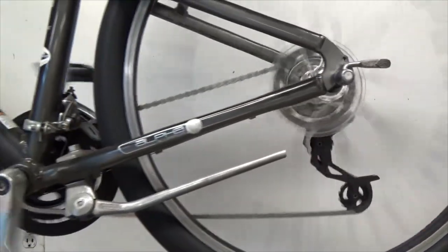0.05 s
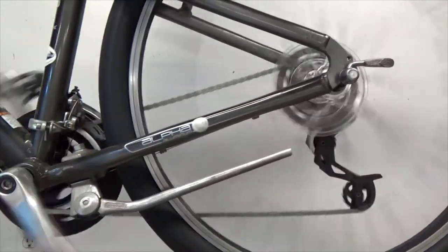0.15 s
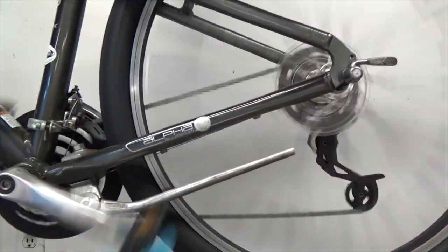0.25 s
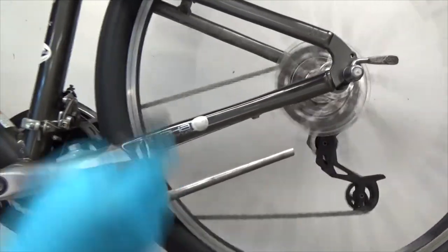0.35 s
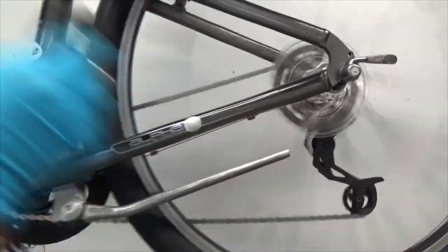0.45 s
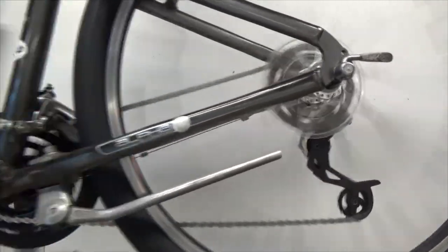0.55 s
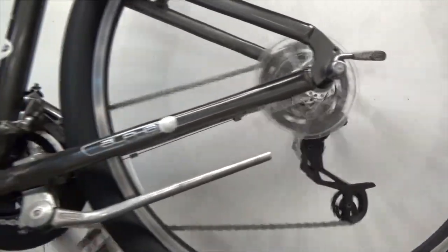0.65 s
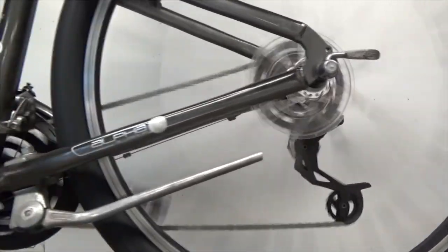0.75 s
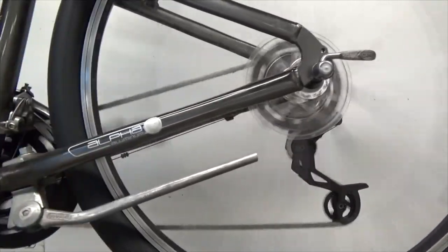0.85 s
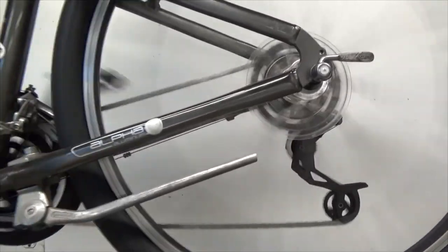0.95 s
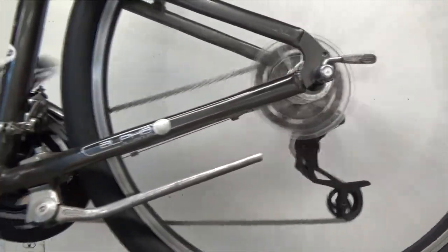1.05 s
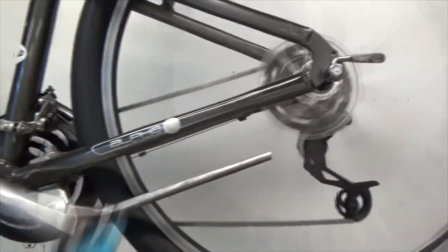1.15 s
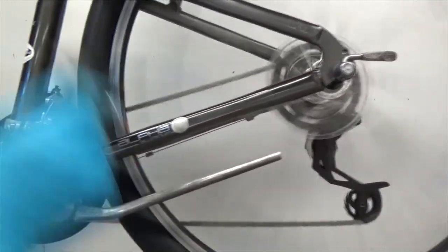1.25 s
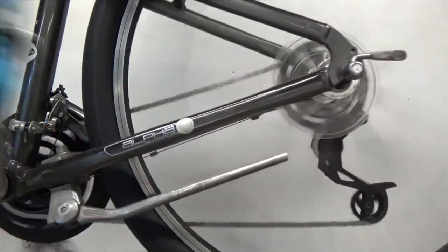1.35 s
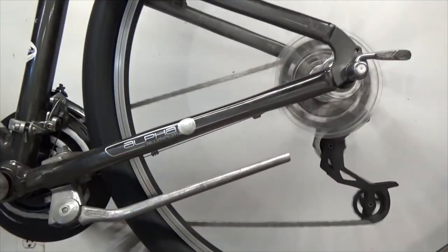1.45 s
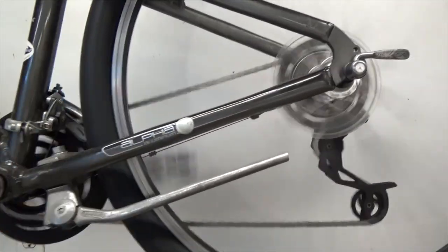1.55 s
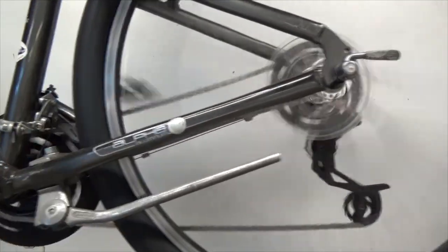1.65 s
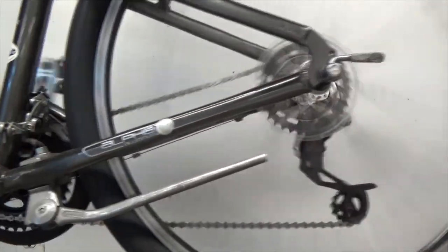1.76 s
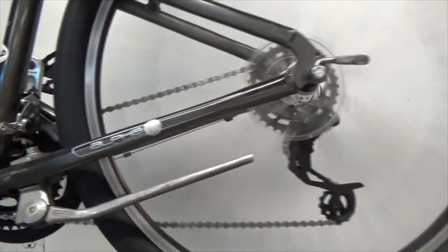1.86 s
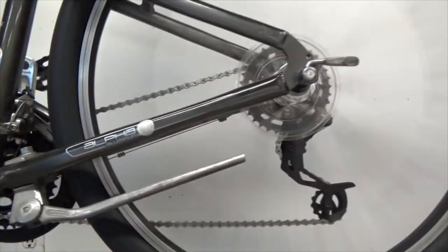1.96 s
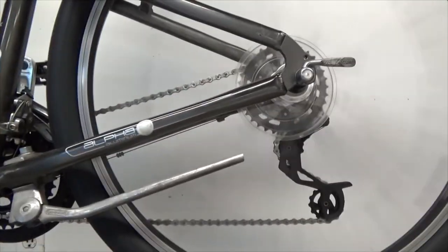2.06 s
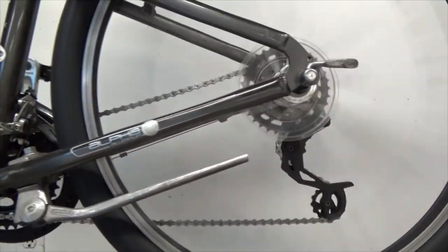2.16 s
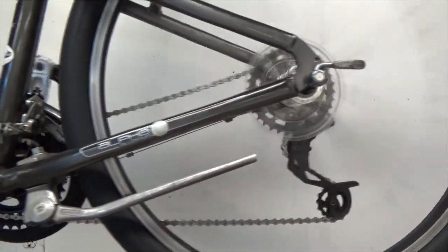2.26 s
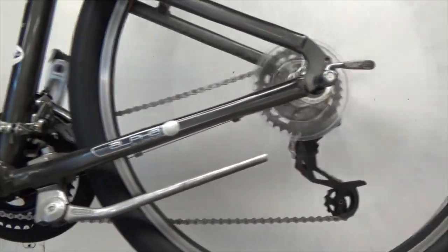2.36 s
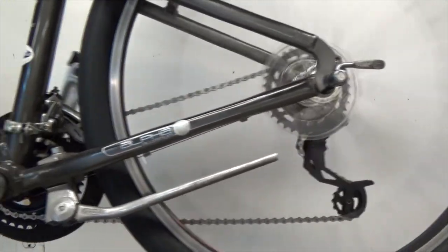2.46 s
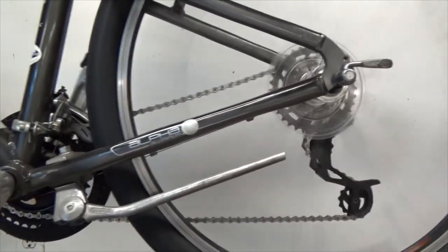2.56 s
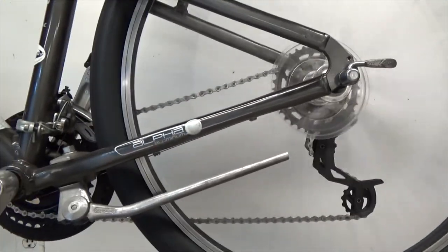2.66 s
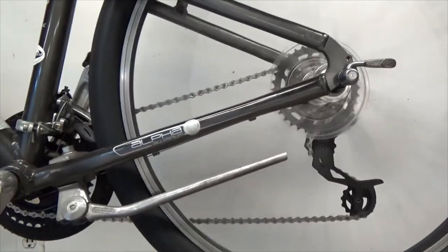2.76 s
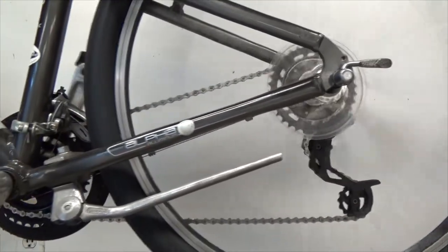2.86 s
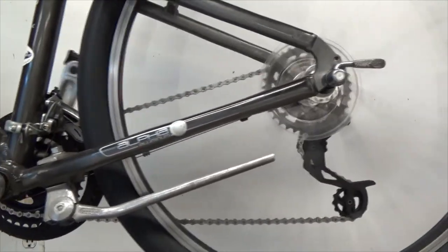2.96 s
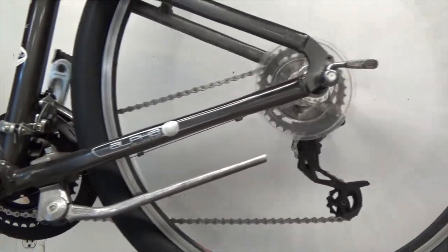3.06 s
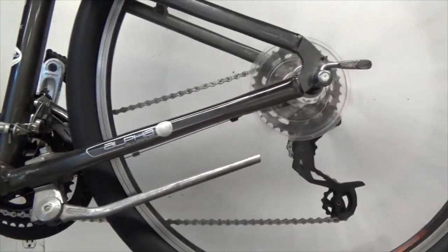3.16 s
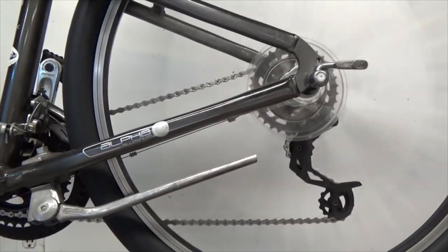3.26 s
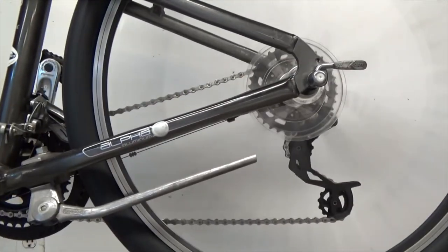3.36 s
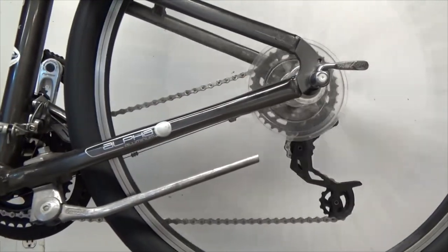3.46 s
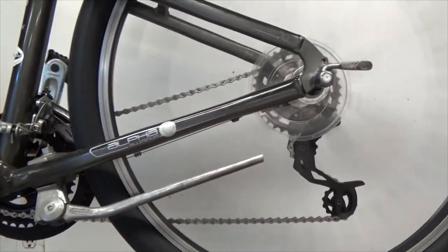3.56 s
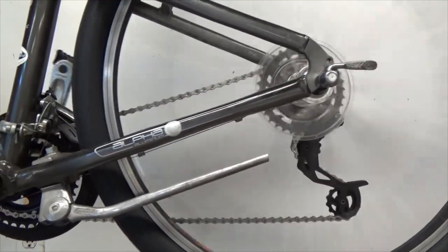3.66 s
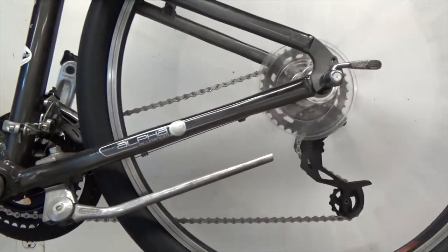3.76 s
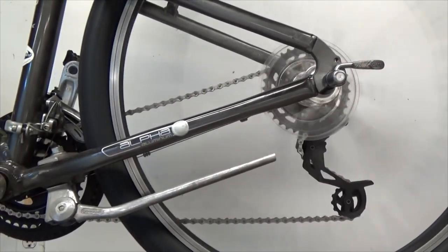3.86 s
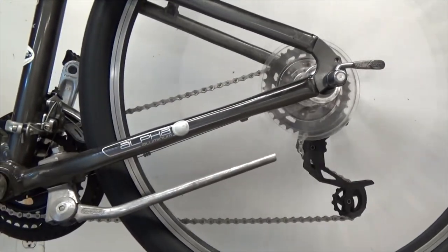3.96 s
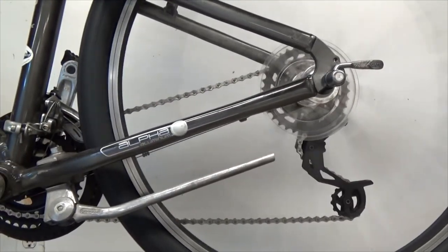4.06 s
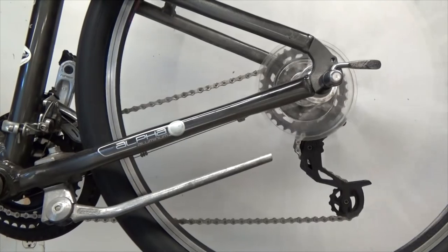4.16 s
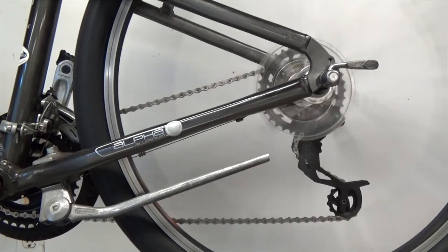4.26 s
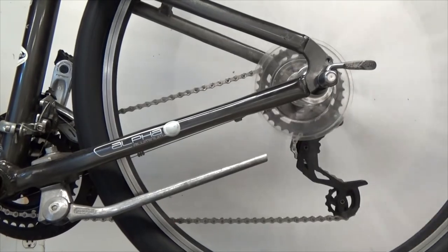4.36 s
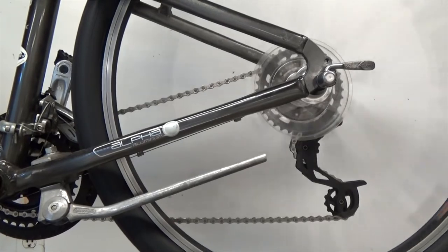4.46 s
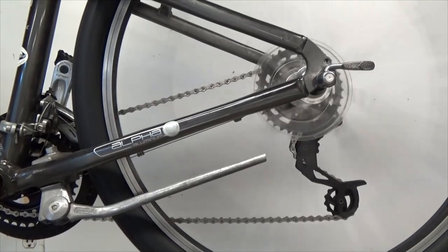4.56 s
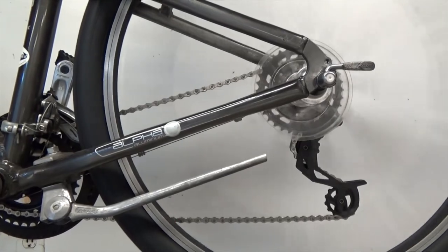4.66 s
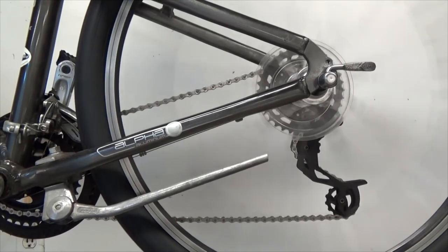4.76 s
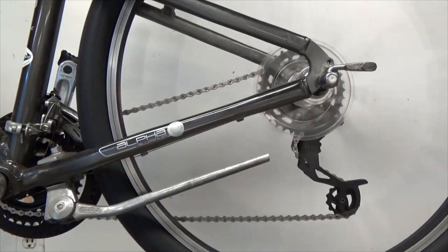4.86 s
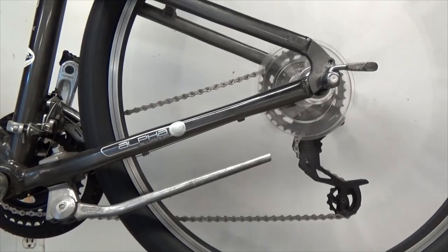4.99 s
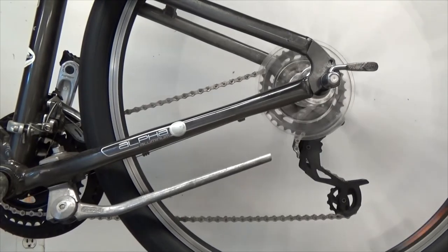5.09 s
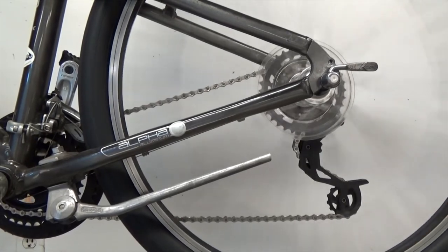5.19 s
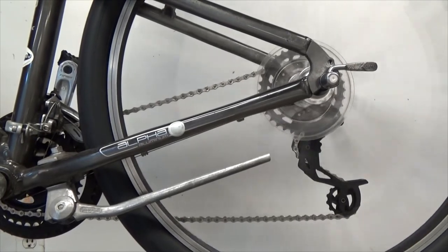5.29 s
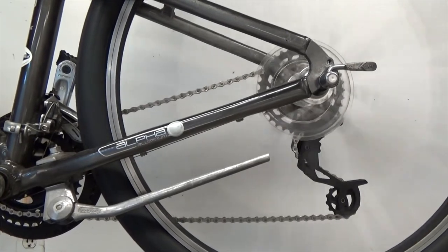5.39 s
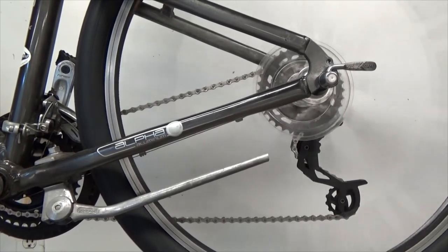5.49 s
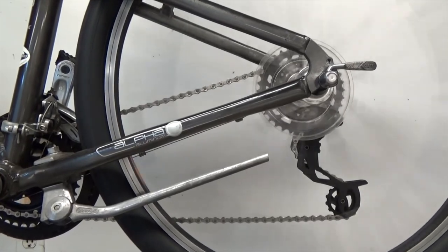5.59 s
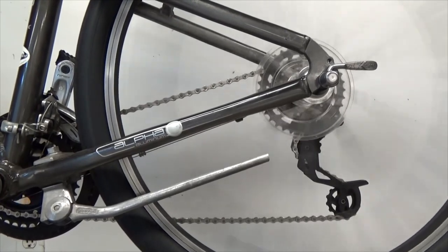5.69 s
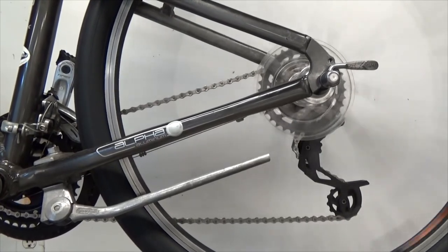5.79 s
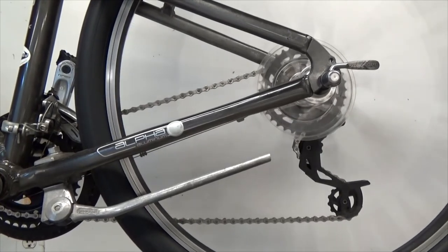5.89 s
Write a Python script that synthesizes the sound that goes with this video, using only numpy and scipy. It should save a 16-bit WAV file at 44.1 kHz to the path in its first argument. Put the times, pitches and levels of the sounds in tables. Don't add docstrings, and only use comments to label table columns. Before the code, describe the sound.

A bicycle on a stand is heard very close in a small hard room. For almost two seconds, a hand-turned crank drives the chain with thin, bright snaps, link rustle and a few low frame knocks, growing louder and faster. Then the chain stops and the freewheel clicks rapidly, about thirty-five a second, easing to twenty-eight, over faint hiss and hum.

```python
import sys
import numpy as np
from scipy import signal
from scipy.fft import rfft, irfft, next_fast_len
from scipy.io import wavfile
from scipy.ndimage import uniform_filter1d, map_coordinates

SR = 44100
rng = np.random.default_rng(int(sys.argv[2]) if len(sys.argv) > 2 else 0)


def volts(x):
    e = np.asarray(x, float) / 20
    return 10 ** e


def wav_record(signal):
    frames = np.transpose(np.atleast_2d(signal))
    bounded = np.clip(frames, -1, 1)
    quanta = np.round(bounded * 32767).astype(np.int16)
    wavfile.write(sys.argv[1], SR, quanta)


N = 261513

# pitch in Hz, level in dB per Hz.
HISS_SPECTRUM = [(120, -33), (200, -14.5), (409, -4), (659, -3), (2420, 3), (2700, -3.5), (6640, 1.5),
                 (10100, -18), (16000, -30)]
# pitch in Hz, level in dB per Hz.
AIR_SPECTRUM = [(12, -45), (20, 2.5), (92, -4.5), (167, -11.5), (200, 4), (260, -8), (440, -120)]
# pitch in Hz, difference against the common part in dB.
LEFT_RIGHT_SPREAD = [(60, -15), (110, -9), (200, -21), (380, -14.5), (700, -13.5), (1290, -14.5),
                     (2380, -17.5), (4400, -25), (8120, -17.5), (15000, -31)]
# time in seconds, level in the thin stays in dB.
FRAME_SHAKE = [(0, -59.5), (.13, -64.5), (.58, -64), (.76, -58.5), (1.48, -57), (1.9, -50.5), (2.61, -48),
               (2.9, -54), (3.45, -50), (3.63, -51.5), (3.9, -48.5), (4.28, -52.5), (4.53, -50.5),
               (4.86, -54.5), (5.1, -52.5), (5.48, -54), (5.93, -52)]
# pitch in Hz, width in Hz, level in dB.
STAY_MODES = [(452, 38, -11.5), (552, 51, -12.5), (647.6, 28.3, -0.5), (766.4, 15, -9.5), (800, 40, -20.5),
              (1112, 46, -10.5), (1213, 43, -12.5), (1470, 120, -14.5)]
# pitch in Hz, width in Hz, level in dB.
TUBE_MODES = [(136, 30, -19.5), (202.5, 23, -21), (222.4, 7.8, -5.5), (264.3, 4.7, 1.5), (342.6, 27, -9)]
TUBES_DB, TUBES_FOLLOW = -61.5, 0.65
AIR_DB, AIR_FOLLOW = -70.5, 0.38

# time in seconds, level in dB, upper ring in dB against it.
CRANK_KNOCKS = [(0.566, -47.5, 3.5), (.585, -46, -7), (.603, -42, -7), (.63, -47.5, -6), (0.656, -47.5, -7),
                (0.708, -48, -18), (1.481, -40, 1), (1.494, -39, -10), (1.505, -49, -11),
                (1.518, -45.5, -2), (1.529, -42.5, -6)]
# pitch in Hz, width in Hz, level in dB.
KNOCK_LOW_MODES = [(254.4, 16.7, 2), (460, 31, -1.5), (623, 17, 4.5), (780, 54, -4.5)]
# pitch in Hz, width in Hz, level in dB.
KNOCK_HIGH_MODES = [(1115, 27, 3.5), (980, 90, -9.5)]

# pitch in Hz, level in dB per Hz.
LINK_SPECTRUM = [(530, -15.5), (900, -7.5), (1060, -10), (2080, -3), (2340, -1), (2680, -3.5), (5000, -2.5),
                 (6500, -51), (11000, -120)]
# pitch in Hz, level in dB per Hz.
PLATE_SPECTRUM = [(2650, -51), (4500, -1), (6220, 2.5), (7820, 2.5), (9610, 4), (12100, -8.5), (15200, -14),
                  (16000, -30)]
BRISK = 35.44
LINKS_DB, LINKS_GROWS = -47.5, 2.84
PLATES_DB, PLATES_GROWS = -44, 2.7
PUSH_TIMES = (0.62, 1.61)
PUSH_WIDTH_S, PUSH_DB = 0.052, 2.5

# time in seconds, teeth per second.
CHAIN_SPEED = [(0.0, 20.93), (0.08, 24.86), (0.36, 25.42), (0.43, 28.99), (0.69, 29.79), (0.74, 29.18),
               (1.01, 34.9), (1.05, 35.99), (1.3, 38.62), (1.48, 38.57), (1.64, 43.42), (1.74, 34.07)]
CHAIN_START = -.244
# time in seconds, roller snap in dB.
HAND_EFFORT = [(0, -28.5), (.45, -31), (.6, -26), (.985, -27), (.995, -19.5), (1.3, -18), (1.71, -15),
               (1.74, -33)]
UPPER_DB, UPPER_GROWS, HARD_DB = -5, .45, -17
# time in seconds, dB more, upper ring dB more.
ROLLER_ACCENTS = [(.097, -20, 0), (.215, -20, 0), (.296, -13, 7), (.334, -6, 13), (.446, -1, 1),
                  (.514, 5, 1.5), (.549, -5, -4), (.583, 3, 1), (.651, -2, -8), (.684, 1.5, 4.5),
                  (.717, -9, -6), (.752, -7, 4), (.818, -7, 8), (.911, -5, -7), (.942, -15, 0),
                  (.972, -12, 0), (1.112, 6.5, 2), (1.139, 5, -6), (1.167, -8, 1), (1.22, -5, -8),
                  (1.272, 1, -6), (1.35, 4, 3.5), (1.429, -1.5, 3), (1.506, -3, -4), (1.556, -23, 17),
                  (1.579, 4.5, -7), (1.604, -4.5, 6.5), (1.627, -5, -1), (1.7, -0.5, -2), (1.651, 5, -10)]
# time in seconds, snap in dB, upper ring in dB against the snap.
LOOSE_LINKS = [
    (.277, -40, 1),
    (.4274, -43, -7),
    (.658, -30, -10),
    (0.699, -27, -10),
    (.9622, -27, -10),
]
# pitch in Hz, width in Hz, level in dB.
TOOTH_LOW_MODES = [(5500, 4600, 0), (6720, 1820, 7.5)]
# pitch in Hz, width in Hz, level in dB.
TOOTH_HIGH_MODES = [(9570, 1600, 15), (10400, 1300, -9)]

# time in seconds, sprocket rattle in dB,
# hub ring in dB against the rattle, spoke ring in dB against the rattle.
PAWL_SLIPS = [(0.0114, -39.5, -17, -22), (0.0634, -31.5, -10, -9), (0.136, -36, -7, -15),
              (0.153, -28.5, -7, -22), (0.462, -37, -12, -9), (0.567, -35.5, -1, -5),
              (0.718, -31, -2.5, -10), (1.3884, -28, -7, -13), (1.467, -25, -28, -30),
              (1.52, -19.5, -16, -40), (1.5918, -26, -17, -15), (1.634, -26.5, -15, -10.5),
              (1.6643, -26, -18, -26), (1.7716, -24, -9, -13), (1.8108, -22.5, -14, -14.5)]
# time in seconds, rattle in dB,
# hub ring in dB against the rattle, spoke ring in dB against the rattle.
CAGE_SCUFFS = [
    (1.037, -39, -7, 2.5),
    (1.05, -35, -5, -5),
]
# time in seconds, teeth per second.
WHEEL_SPEED = [(1.83, 35.32), (2.21, 35.98), (2.4, 39.84), (2.67, 34.49), (3.03, 30.64), (3.28, 33.34),
               (3.49, 32.45), (3.68, 34.51), (3.95, 31.43), (4.41, 30.44), (4.47, 30.94), (4.8, 29.6),
               (4.87, 30.16), (5.49, 28.36), (5.58, 28.72), (5.93, 27.6)]
WHEEL_START, TEETH = 1.462, 20
PAWL_LEAD_S = .0015
RING_OFF_CENTRE = (.036, .16)
# swings per turn, size in dB, loudest point as a share of the cycle.
RATTLE_SWINGS = (-22, 1), [(1, 0.63, 0.26), (2, 0.2, 0.26)]
# mean in dB and scatter in dB, then swings per turn, size in dB, loudest cycle share.
HUB_SWINGS = (-29, 1), [(1, 1.25, 0.36), (2, 2.98, -.39), (4, 0.74, -0.23)]
# mean in dB and scatter in dB, then swings per turn, size in dB, loudest cycle share.
SPOKE_SWINGS = (-37, 1.6), [(1, 1.86, .22), (2, 0.64, -0.052)]
# pitch in Hz, width in Hz, level in dB.
SPROCKET_MODES = [(5750, 2550, -11.5), (7690, 324, 0), (8300, 1280, -4), (9840, 1240, -2.5),
                  (10365, 630, -3.5), (11840, 1500, -15), (12630, 1100, -18.5), (14100, 420, -17),
                  (15900, 3800, -21.5)]
# pitch in Hz, width in Hz, level in dB.
HUB_MODES = [(3716, 340, -6), (4100, 99, 4.5), (4600, 420, -4.5), (5110, 117, -3), (5310, 360, -6.5)]
# pitch in Hz, width in Hz, level in dB.
SPOKE_MODES = [(1610, 79, -3), (1850, 160, -3.5), (2287, 177, 3.5), (2910, 460, -4)]
FLOOR_S, WALL_S = .0023, .0142


def unit(x):
    return x / np.sqrt(np.mean(x ** 2, -1, keepdims=True) + 1e-20)


def along(points, hz):
    f, v = np.transpose(points)
    return np.interp(np.log(hz + 1), np.log(f + 1), v)


def curves(rows):
    s, *cols = np.transpose(rows)
    return [np.interp(np.arange(N) / SR, s, c, right=c[-1]) for c in cols]


def wobble(rate):
    knots = rng.standard_normal((int(N * rate / SR) + 4))
    return map_coordinates(knots, [np.arange(N) * rate / SR])


def placed(times, rows):
    places = np.round(times * SR).astype(int)[:, None] + np.arange(rows.shape[1])
    return np.bincount(places.ravel(), rows.ravel(), N + SR)[:N]


def filtered(x, response):
    n = x.shape[-1]
    m = next_fast_len(n + min(n, 8192))
    return irfft(rfft(x, m) * response(np.fft.rfftfreq(m, 1 / SR)), m)[..., :n]


def body(modes, order=1, vary=np.zeros((1, 30, 2))):
    def response(f):
        total = 0
        for k, (centre, width, db) in enumerate(modes):
            c = centre * (1 + vary[:, k, :1])
            peak = 1j * f * width / (c * c - f * f + 1j * f * width)
            total = total + (-1) ** k * volts(db + vary[:, k, 1:]) * peak
        return total ** order
    return response


def pair(spectrum, side_db):
    def apart(hz):
        return spectrum(hz) * [np.ones(len(hz)), volts(side_db + along(LEFT_RIGHT_SPREAD, hz))]
    mid, side = filtered(rng.standard_normal((2, N)), apart)
    return unit(np.array([mid + side, mid - side]))


def blows(times, level_db, modes, order, rise, hold, t60, floor_db, wall_db, room_db, room_t60):
    t = np.arange(2048) / SR
    shape = (len(times), len(t))
    chatter = (1 - np.exp(-t / rise)) * volts(-60 * np.maximum(t - hold, 0) / t60)
    vary = [.008, 1.8] * rng.standard_normal((len(times), len(modes), 2))
    jabs = volts(16.7 * uniform_filter1d(rng.standard_normal(shape), size=24))
    contact = chatter * jabs * rng.standard_normal(shape)
    rings = volts(level_db)[:, None] * unit(filtered(contact, body(modes, order, vary)))
    drift = rng.uniform(-1, 1, (len(times), 4))
    floor = placed(times + FLOOR_S + .00025 * drift[:, 0], rings * volts(floor_db + 2.5 * drift[:, 1:2]))
    wall = placed(times + WALL_S + .0014 * drift[:, 2], rings * volts(wall_db + 5 * drift[:, 3:]))
    skew = volts([[1.5], [-1.5]])
    u = np.arange(SR // 2) / SR
    fade = (1 - np.exp(-u / 0.0006)) * volts(-120 * u / room_t60)
    power = signal.fftconvolve(placed(times, volts(2 * level_db)[:, None]), fade)[:N]
    diffuse = volts(room_db) * np.sqrt(np.abs(power)) * pair(body(modes, order), side_db=10.0)
    return placed(times, rings) + skew * floor + wall / skew + diffuse


def hiss():
    return volts(-54) * pair(lambda hz: volts(along(HISS_SPECTRUM, hz)), side_db=10.5)


def frame():
    stays_db, = curves(FRAME_SHAKE)
    swing_db = stays_db - np.median(stays_db)
    tubes_db = TUBES_DB + TUBES_FOLLOW * swing_db + 1.5 * wobble(5)
    air_db = AIR_DB + AIR_FOLLOW * swing_db + 2.2 * wobble(6)
    stays = volts(stays_db + 0.4 * wobble(9)) * pair(body(STAY_MODES), side_db=-4.5)
    tubes = volts(tubes_db) * pair(body(TUBE_MODES), side_db=-2.0)
    air = volts(air_db) * pair(lambda hz: volts(along(AIR_SPECTRUM, hz)), side_db=4.0)
    return stays + tubes + air


def jolts():
    s, db, upper_db = np.transpose(CRANK_KNOCKS)
    rough = np.hanning(300) * (.5 + rng.standard_normal((len(s), 300)))
    soft = unit(uniform_filter1d(rough, size=12))

    def shove(level_db):
        return placed(s, volts(level_db + 15.5)[:, None] * soft)[None]
    low = filtered(shove(db), body(KNOCK_LOW_MODES))
    high = filtered(shove(db + upper_db), body(KNOCK_HIGH_MODES))
    return low + high


def rustle():
    t = np.arange(N) / SR
    speed_db = 20 * np.log10(curves(CHAIN_SPEED)[0] / BRISK)
    turning = np.interp(t, [1.74, 1.82], [1, 0])
    lumps = unit(uniform_filter1d(rng.standard_normal((2, N)), size=90))
    grains = unit(volts(2.5 * lumps))
    links = grains[0] * pair(lambda hz: volts(along(LINK_SPECTRUM, hz)), side_db=4.0)
    plates = grains[1] * pair(lambda hz: volts(along(PLATE_SPECTRUM, hz)), side_db=7)
    links = volts(LINKS_DB + LINKS_GROWS * speed_db) * links
    plates = volts(PLATES_DB + PLATES_GROWS * speed_db) * plates
    patchy_db = 2.2 * wobble(40) + 1.2 * wobble(12)
    push_db = PUSH_DB * sum(np.exp(-((t - s) / PUSH_WIDTH_S) ** 2) for s in PUSH_TIMES)
    return turning * volts(push_db + patchy_db) * (links + plates)


def passing(speed, start, early=lambda tooth: 0):
    t = np.arange(speed[0][0], speed[-1][0], 1 / SR)
    count = start + np.cumsum(np.interp(t, *np.transpose(speed))) / SR
    tooth = np.arange(np.ceil(start), count[-1] // 1 + 1)
    return tooth, np.interp(tooth - early(tooth), count, t)


def rollers():
    _, s = passing(CHAIN_SPEED, CHAIN_START)
    db = np.interp(s, *np.transpose(HAND_EFFORT))
    upper_db = UPPER_DB + UPPER_GROWS * (db - HARD_DB)
    at, more_db, upper_more_db = np.transpose(ROLLER_ACCENTS)
    hit = np.abs(s[:, None] - at) < .012
    return list(zip(s, db + hit @ more_db, upper_db + hit @ upper_more_db)) + LOOSE_LINKS


def chain():
    s, db, upper_db = np.transpose(rollers())
    snap = dict(order=2, rise=.0001, hold=.0001, t60=.001)
    low = blows(s + .00045, db - 23.5, TOOTH_LOW_MODES, **snap,
                floor_db=-6.0, wall_db=-20, room_db=-2.5, room_t60=0.23)
    high = blows(s + .0004, db + upper_db - 17.0, TOOTH_HIGH_MODES, **snap,
                 floor_db=-5.0, wall_db=-13, room_db=4, room_t60=0.052)
    return filtered(low + high, lambda hz: 1 / (1 + (hz / 11000) ** 12))


def coasting():
    def early(k):
        return RING_OFF_CENTRE[0] * np.cos(2 * np.pi * (k / TEETH - RING_OFF_CENTRE[1]))
    tooth, s = passing(WHEEL_SPEED, WHEEL_START, early)
    levels = []
    for (mean_db, scatter_db), swings in [RATTLE_SWINGS, HUB_SWINGS, SPOKE_SWINGS]:
        level_db = mean_db + scatter_db * rng.standard_normal(len(s))
        for per_turn, db, at in swings:
            level_db = level_db + db * np.cos(2 * np.pi * (per_turn * tooth / TEETH - at))
        levels.append(level_db)
    rattle, hub, spoke = levels
    return list(zip(s - PAWL_LEAD_S, rattle, hub - rattle, spoke - rattle))


def ratchet():
    s, db, hub_db, spoke_db = np.transpose(PAWL_SLIPS + CAGE_SCUFFS + coasting())
    s = s + .0004
    rattle = blows(s, db - 19, SPROCKET_MODES, order=1, rise=.0004, hold=.0022, t60=0.048,
                   floor_db=-11, wall_db=-14.5, room_db=0, room_t60=0.29)
    hub = blows(s + .0003, db + hub_db - 17.0, HUB_MODES, order=1, rise=.0002, hold=.0003, t60=.0022,
                floor_db=-6.5, wall_db=-49.0, room_db=3.0, room_t60=0.14)
    spokes = blows(s, db + spoke_db - 13, SPOKE_MODES, order=1, rise=.0011, hold=.0013, t60=0.052,
                   floor_db=-8.5, wall_db=-7.5, room_db=-6.5, room_t60=1.0)
    return rattle + hub + spokes


def scene():
    return hiss() + frame() + jolts() + rustle() + chain() + ratchet()


def band_limit(x):
    return signal.sosfilt(signal.butter(12, 16820, fs=SR, output="sos"), x)


def record(dry):
    def colour(hz):
        return (hz < 15900) * (1j * hz / (170 + 1j * hz))
    return band_limit(filtered(dry, colour))


dry = scene()
out = record(dry)
wav_record(out)
```